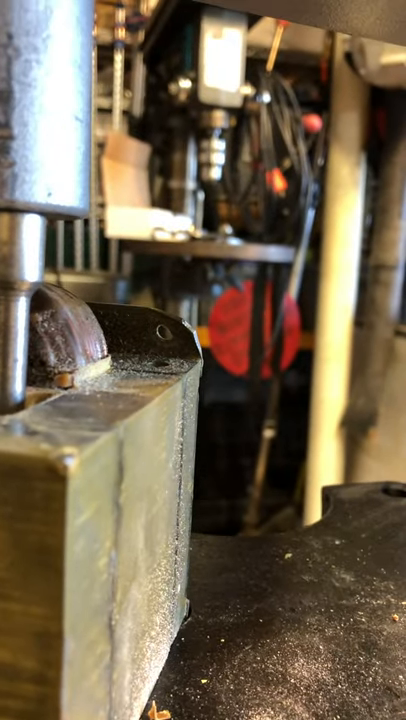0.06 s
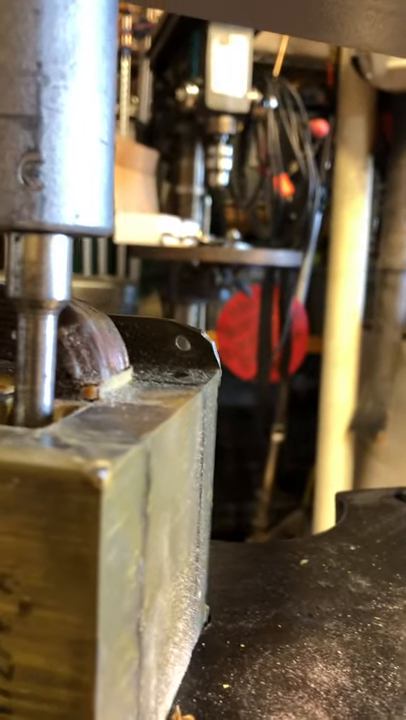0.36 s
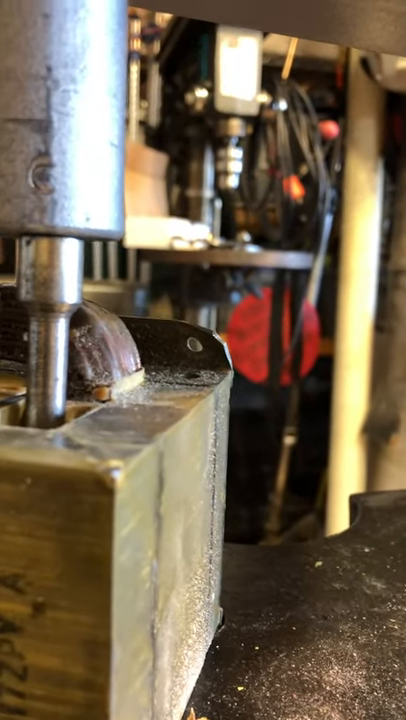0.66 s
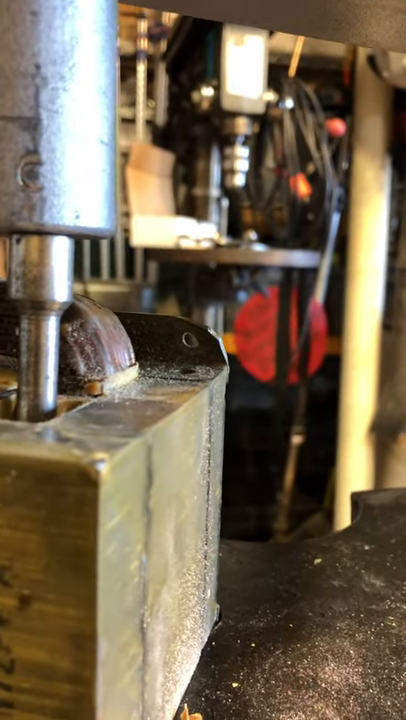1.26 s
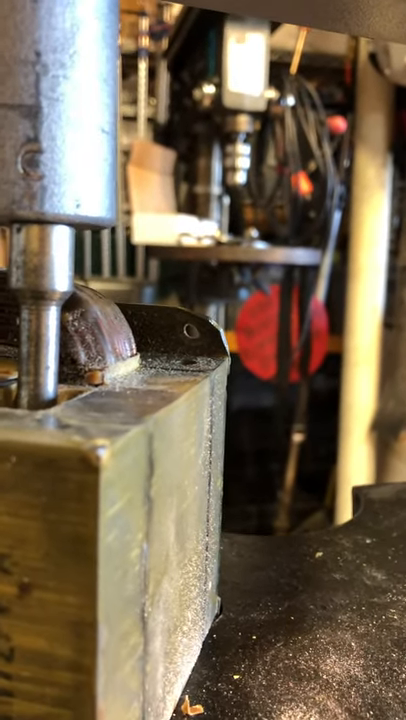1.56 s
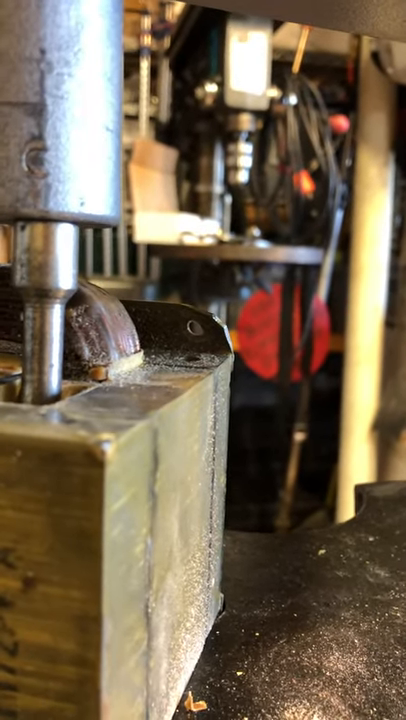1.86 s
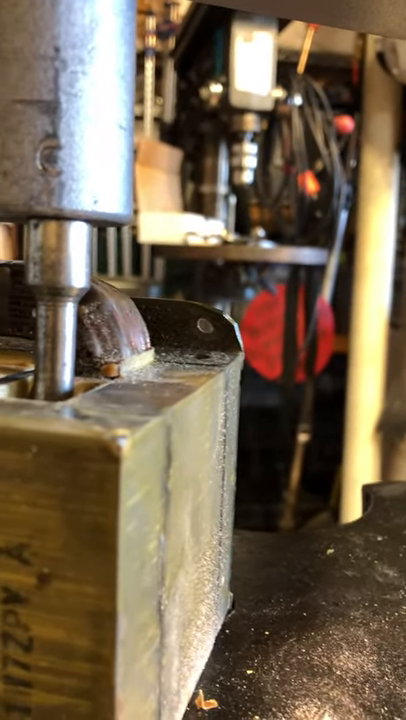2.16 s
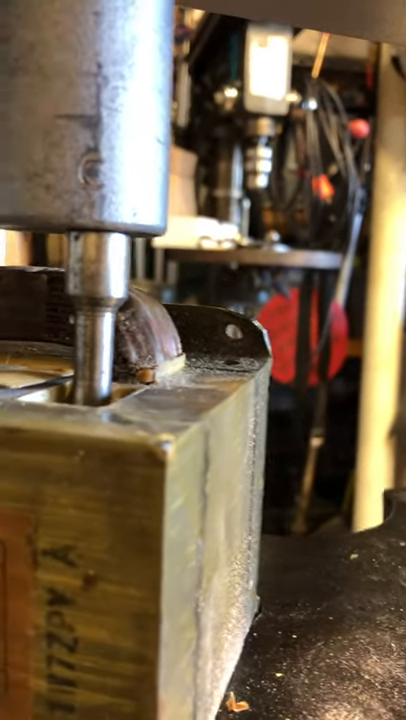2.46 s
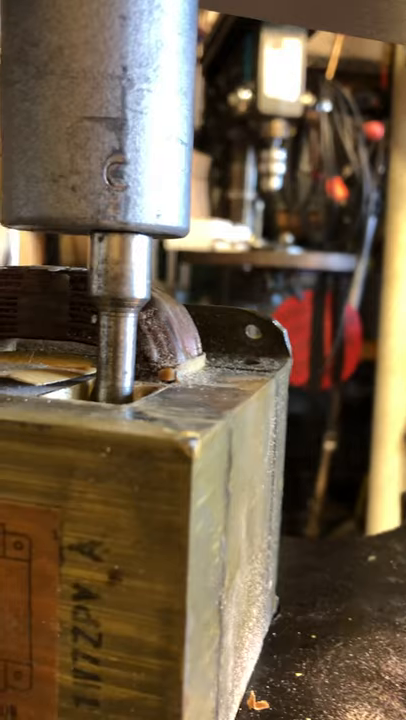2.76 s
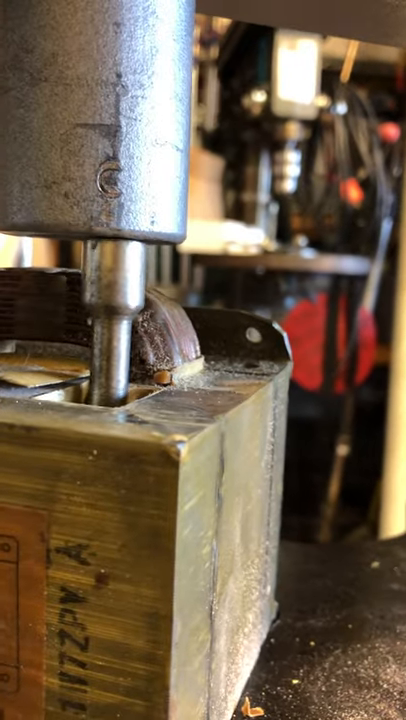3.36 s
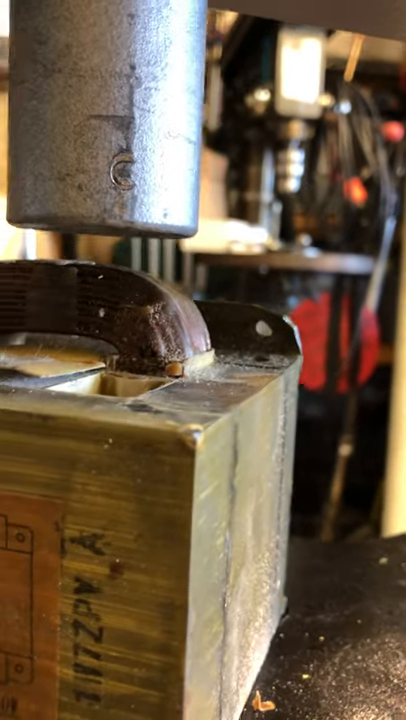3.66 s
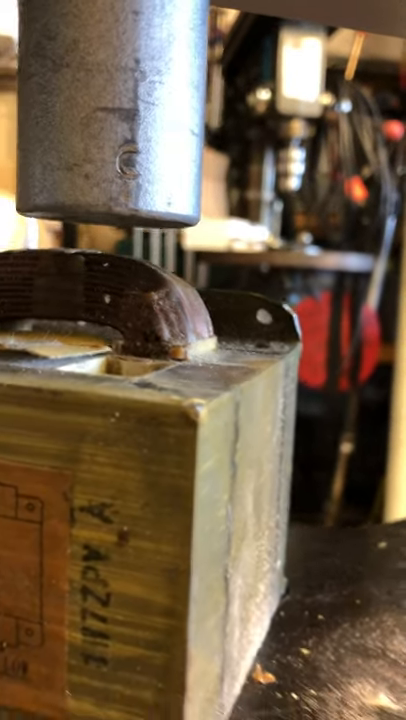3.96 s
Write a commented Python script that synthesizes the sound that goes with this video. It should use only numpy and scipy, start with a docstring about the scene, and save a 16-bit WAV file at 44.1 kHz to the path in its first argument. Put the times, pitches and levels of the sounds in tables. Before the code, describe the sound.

Air-driven hydraulic press pumping and hissing, then a steel pin drops with a ringing clang.

```python
"""Hissing air and a pump's quick beat: an air-driven hydraulic press, close to a single microphone
in a small workshop, is pushing a steel pin out of a block. Each stroke is a puff of exhaust air,
a low whump and the knock of the piston. The pin shifts with a tick, the pump stops, and the pin
drops, bounces and rings, loud enough at the microphone to drive the recorder's limiter."""
import sys
import numpy as np
from scipy import signal
from scipy.fft import rfft, irfft, next_fast_len
from scipy.io import wavfile

SR = 44100
rng = np.random.default_rng(int(sys.argv[2]) if len(sys.argv) > 2 else 0)


def bounce(signal):
    """Save signal as a 16-bit WAV file at the path given by the first command-line argument."""
    frames = np.transpose(np.atleast_2d(signal))
    limited = np.clip(frames, -1, 1)
    pcm = np.round(limited * 32767).astype(np.int16)
    wavfile.write(sys.argv[1], SR, pcm)


N = 176400
LEAD = SR // 10  # samples before time zero: the pump is already running
AGE = np.arange(SR // 2) / SR  # time since an event began [s]


def amp(db):
    """Decibels to gain."""
    return 10 ** (np.asarray(db) / 20)


def fade(t, t60):
    """A decay of 60 dB in t60 seconds."""
    return np.exp(-np.log(1000) * np.maximum(t, 0) / t60)


def bell(peak_s, width_s):
    """A Gaussian swell and fall."""
    return np.exp(-.5 * ((AGE - peak_s) / width_s) ** 2)


def along(points, hz):
    """Read (frequency, value) points along a log axis."""
    f, values = np.transpose(points)
    return np.interp(np.log(hz + 1), np.log(f + 1), values)


def resonances(rows, f):
    """Gain of a set of (centre, width, level) resonances."""
    return np.sqrt(sum(abs(amp(db) * f * width / (hz * hz - f * f + 1j * f * width)) ** 2
                       for hz, width, db in rows))


def noise(gain, size=len(AGE)):
    """Noise of rms 1, coloured by a gain over frequency."""
    x = irfft(rfft(rng.standard_normal(size)) * gain(np.fft.rfftfreq(size, 1 / SR)), size)
    return x / x.std()


def ring(modes):
    """Struck modes (frequency, level, t60) dying away."""
    return sum(amp(db) * fade(AGE, t60) * np.sin(2 * np.pi * hz * AGE) for hz, db, t60 in modes)


def add(track, s, sound):
    """Mix a sound into a track at time s."""
    part = track[LEAD + round(s * SR):][:len(sound)]
    part += sound[:len(part)]


# the workshop's reverberation (frequency [Hz], t60 [s])
ROOM_DECAY = [(80, .3), (500, 0.38), (1200, 0.5), (3000, 0.24), (7000, 0.34), (14000, 0.15)]
def workshop(x, wet_db):
    """The direct sound reaches the microphone, then the short answer of nearby walls."""
    hz, t, spectrum = signal.stft(rng.standard_normal(SR // 2), SR, nperseg=256)
    tail = signal.istft(spectrum * fade(t, along(ROOM_DECAY, hz)[:, None]), SR, nperseg=256)[1]
    tail[:SR // 400] = 0  # gap before the first reflection
    return x + amp(wet_db) * signal.fftconvolve(x, tail / np.linalg.norm(tail))[:len(x)]


# colour of the air hiss (frequency [Hz], relative level [dB])
HISS_COLOUR = [(25, -28), (50, -12), (100, -3), (150, -16), (200, -9), (330, -14), (450, -10.5), (600, -11),
               (800, -15.5), (1100, -1), (1350, -19), (1700, -10.5), (2100, -10), (2500, -32),
               (2950, -10.5), (3500, -10), (4000, -6.5), (4500, -11), (5250, 1), (5900, -12), (6750, -1.5),
               (7600, -8.5), (8400, -8.5), (9300, -13.5), (10800, -13), (12400, -3.5), (12900, -3.5),
               (13500, 0), (14600, -7), (15800, -30)]
# resonances in the workshop's hum (centre [Hz], width [Hz], relative level [dB])
HUM_BANDS = [(74.5, 6.2, -13), (1169, 33, -3.5), (1467, 20, -6.5), (2980, 116, -7.5)]
def air(stop_s=3.67, fall_db_per_s=164):
    """Air hisses until the pump stops; the workshop's hum lies under it throughout."""
    t = np.arange(-LEAD, N) / SR
    hiss_db = -35 - fall_db_per_s * np.maximum(t - stop_s, 0)
    hiss = amp(hiss_db) * noise(lambda f: amp(along(HISS_COLOUR, f)), len(t))
    hum = amp(-46) * noise(lambda f: resonances(HUM_BANDS, f), len(t))
    return hiss + hum


# pump strokes, for exhaust and piston alike (time [s], level [dB])
PUMP_STROKES = [(-.019, -3.5), (0.19, -5), (0.399, -4.5), (0.616, -5), (0.835, -5), (1.055, -4.5),
                (1.275, -5), (1.496, -5.5), (1.705, -4.5), (1.913, -4.5), (2.121, -5), (2.331, -5),
                (2.54, -5), (2.75, -5), (2.96, -5), (3.17, -5.5), (3.381, -5), (3.591, -5.5)]
# colour of a puff (frequency [Hz], relative level [dB])
PUFF_COLOUR = [(100, 3), (400, -5), (800, -3), (1500, -1.5), (2600, -1), (3400, -6.5), (4700, -3.5),
               (6000, -3), (8800, -5), (10500, -8.5), (15500, -16)]
# muffler resonances, applied twice to the rasp (centre [Hz], width [Hz], relative level [dB])
MUFFLER_BANDS = [(2485, 310, 0.5), (3883, 96, -5), (4250, 260, -10), (5884, 360, -4.5), (6350, 420, -2)]
def exhaust(rise_s=.0034, early_s=.001216, pitch_scatter=.008):
    """Each stroke vents a puff of air, whose first burst barks and whistles in the muffler."""
    track = np.zeros(LEAD + N)
    puff_shape = (1 - np.exp(-(AGE / rise_s) ** 2)) * fade(AGE, t60=.12)
    bark_shape = bell(peak_s=.006, width_s=.0022) + amp(-15) * puff_shape
    for s, db in PUMP_STROKES:
        whistle = sum(
            amp(level) * np.sin(2 * np.pi * (hz * rng.normal(1, pitch_scatter) * AGE + rng.random()))
            for hz, _, level in MUFFLER_BANDS)
        rasp = noise(lambda f: resonances(MUFFLER_BANDS, f) ** 2)
        puff = amp(-3.5) * puff_shape * noise(lambda f: amp(along(PUFF_COLOUR, f)))
        bark = bark_shape * (amp(-11) * rasp + amp(-8.5) * whistle)
        add(track, s - early_s, amp(db) * (puff + bark))
    return workshop(track, wet_db=-10)


# low pressure pulses of one stroke (delay [s], pitch [Hz], half width [s], level [dB])
STROKE_PULSES = [(.0113, 114, 0.004, -12), (0.0253, 530, 0.00075, -0.5), (0.0244, 252, 0.0015, -10.5),
                 (0.0333, 480, 0.0019, -27)]
# casing modes rung by the knock (frequency [Hz], level [dB], t60 [s])
CASING_MODES = [(72.8, -23, 0.31), (117, -43, 0.19), (160, -29.5, 0.089), (224.7, -33.5, 0.44),
                (280.6, -32.5, .22), (359, -58, 0.18), (397, -29.5, 0.34), (447, -53, 0.26),
                (520, -34.5, 0.34), (554, -23.5, 0.18), (628, -23.5, 0.091)]
# resonances of the contact click, applied twice (centre [Hz], width [Hz], relative level [dB])
CLICK_BANDS = [(1250, 400, -4), (2600, 300, -2), (2950, 250, 0)]
def piston():
    """A soft whump, then the piston knocks on its stop with a click, rebounds and rings the casing."""
    thumps, casing = np.zeros((2, LEAD + N))
    casing_ring = ring(CASING_MODES)
    knock_delay = STROKE_PULSES[1][0]
    stroke = sum(amp(db) * np.cos(2 * np.pi * hz * (AGE - delay)) * bell(delay, width)
                 for delay, hz, width, db in STROKE_PULSES)
    for s, db in PUMP_STROKES:
        add(thumps, s, amp(db) * stroke)
        click = amp(-15) * fade(AGE, t60=.022) * noise(lambda f: resonances(CLICK_BANDS, f) ** 2)
        add(casing, s + knock_delay, amp(db) * (casing_ring + click))
    return workshop(thumps, wet_db=-13) + casing


# modes of the block in the press (frequency [Hz], level [dB], t60 [s])
BLOCK_MODES = [(486, -29, .2), (660, -35, .07), (737, -32, .1), (1058, -37, .06), (3165, -33, .06),
               (3381, -37, .2)]
def pin_slip(slip_s=3.482):
    """The pin shifts in its bore and the block answers with a tick."""
    track = np.zeros(LEAD + N)
    add(track, slip_s, ring(BLOCK_MODES))
    return workshop(track, wet_db=-6)


# hits of the falling pin (time [s], level [dB], treble tilt [dB per octave], t60 [s])
PIN_HITS = [(3.7701, -6.5, -3.5, 0.22), (3.7775, -1.5, -2, 0.19), (3.8504, 0, 4.5, .14)]
# colour of a crash before its tilt (frequency [Hz], relative level [dB])
CRASH_COLOUR = [(100, -34), (190, -27), (270, 1.5), (380, -23), (650, -8), (900, 2), (1150, -5), (1450, -1),
                (1900, -2), (2400, 0), (3000, -1.5), (4000, 0.5), (6000, -5), (7000, -14), (9000, -11.5),
                (12000, -24), (15500, -28)]
def pin_crash(rise_s=.001, tilt_above_hz=1780):
    """The pin lands and bounces, each hit a burst of noise that carries into the room."""
    track = np.zeros(LEAD + N)
    for s, db, tilt, t60 in PIN_HITS:
        crash = noise(lambda f: amp(along(CRASH_COLOUR, f)
                                    + tilt * np.log2(np.maximum(f / tilt_above_hz, 1))))
        shape = (1 - np.exp(-AGE / rise_s)) * fade(AGE, t60)
        add(track, s, amp(db) * shape * crash)
    return workshop(track, wet_db=-6)


# modes of the steel pin (frequency [Hz])
PIN_PITCHES = [576, 1206, 1546, 1911, 2576, 2630, 2728, 3173, 3667, 4788, 5390, 5770, 5911, 6265, 7400,
               8649, 9394, 10306, 10962, 11780, 12560]
# how each of those modes rings (landing level [dB], rebound level [dB], t60 [s])
PIN_RINGS = [(-35, -27.5, 3), (-25, -20.5, 2.1), (-9, -15, 2), (-5, -7.5, 0.49), (8.5, -6, 0.18),
             (-4, -19, 0.18), (-9.5, -19, 0.5), (-15, -15.5, 0.62), (-10, -20, 0.41), (-10, -13, 0.33),
             (-5.5, -17, 0.21), (-27, -16, 0.2), (-27, -8.5, 0.25), (-14, -1, 0.18), (-33, -5.5, .26),
             (-4.5, -22.5, 0.45), (-35, -18, .23), (-7, -38, 0.54), (-13, -12, 0.21), (-35, -14, 0.19),
             (-18, -32, 0.31)]
def pin_ring(landing_s=3.778, rebound_s=3.851):
    """The steel rings straight to the microphone; the rebound damps the first ring and starts another."""
    track = np.zeros(LEAD + N)
    landing_db, rebound_db, t60s = zip(*PIN_RINGS)
    damping = fade(AGE - (rebound_s - landing_s), t60=.034)
    add(track, landing_s, damping * ring(zip(PIN_PITCHES, landing_db, t60s)))
    add(track, rebound_s, ring(zip(PIN_PITCHES, rebound_db, t60s)))
    return track


def scene():
    """Air, pump and pin at one microphone near the press."""
    return (air() + exhaust() + piston() + pin_slip() + pin_crash() + pin_ring())[None, LEAD:]


def limiter(x, threshold_db=-10.5, window_s=.0039, ahead_s=.00053, release_db_per_s=250):
    """The gain ducks as the smoothed power passes the threshold, then climbs back."""
    smoothing = np.exp(-1 / (window_s * SR))
    power = signal.lfilter([1 - smoothing], [1, -smoothing], x[0] ** 2)
    over_db = np.maximum(10 * np.log10(power + 1e-12) - threshold_db, 0)
    t = np.arange(N) / SR
    release = release_db_per_s * t
    gain_db = release - np.maximum.accumulate(over_db + release)
    return x * amp(np.interp(t + ahead_s, t, gain_db))


def record(dry):
    """The recorder holds the clang down, rounds off peaks and trims both ends of the band."""
    ceiling, bass_cut_hz, top_hz = .92, 57, 15800
    x = limiter(dry)
    x = x / (1 + (x / ceiling) ** 8) ** (1 / 8)  # soft clipping
    x = signal.sosfilt(signal.butter(2, bass_cut_hz, "highpass", fs=SR, output="sos"), x)
    size = next_fast_len(N + LEAD)
    passband = np.fft.rfftfreq(size, 1 / SR) < top_hz
    return irfft(rfft(x, size) * passband, size)[:, :N]


dry = scene()
out = record(dry)
bounce(out)
```